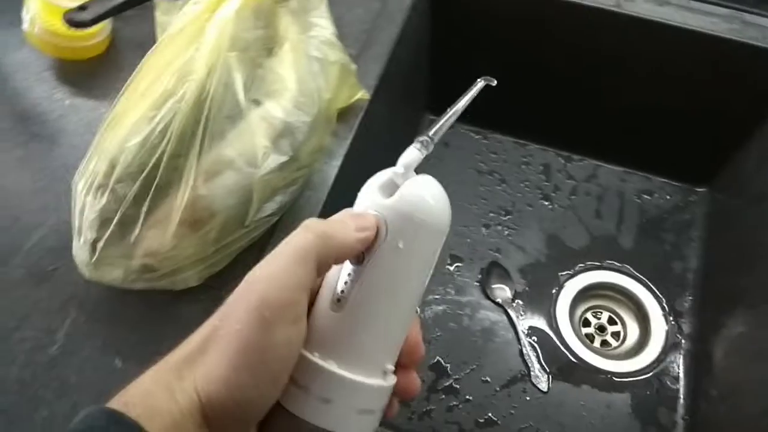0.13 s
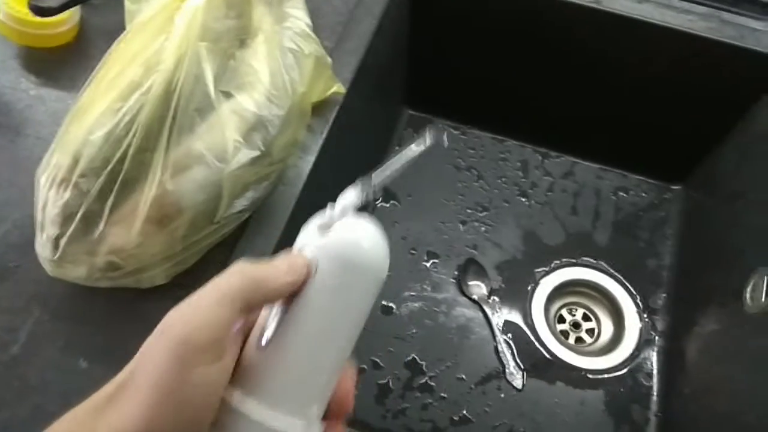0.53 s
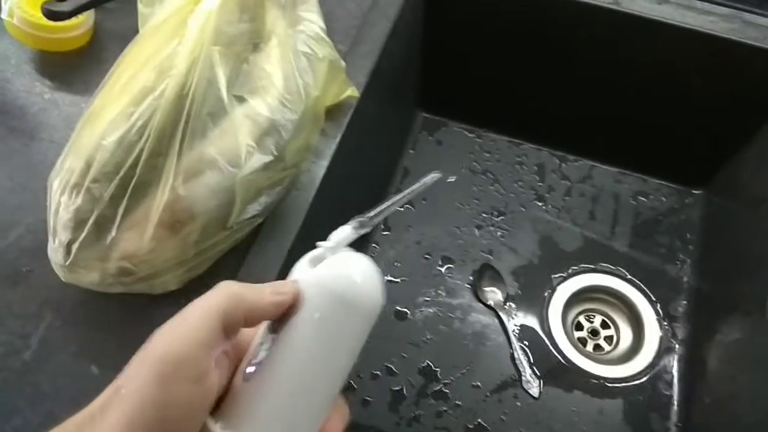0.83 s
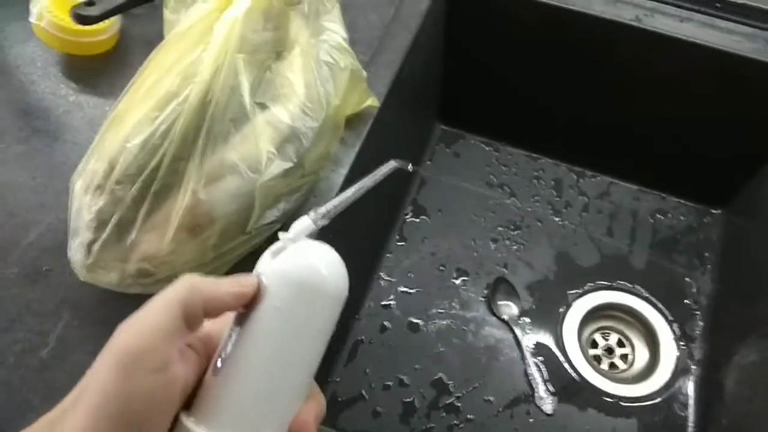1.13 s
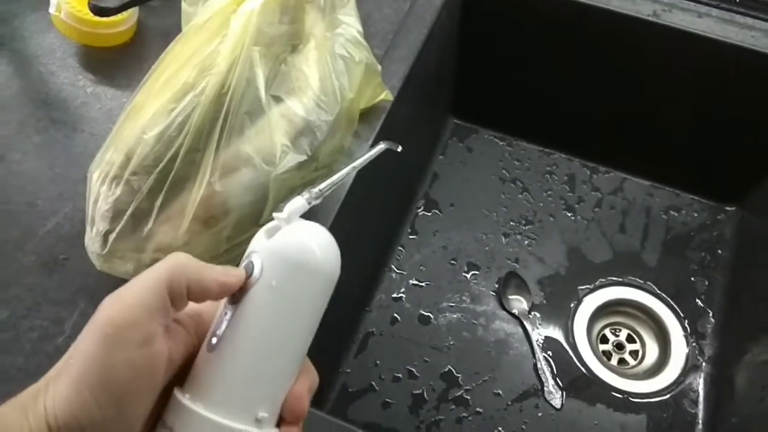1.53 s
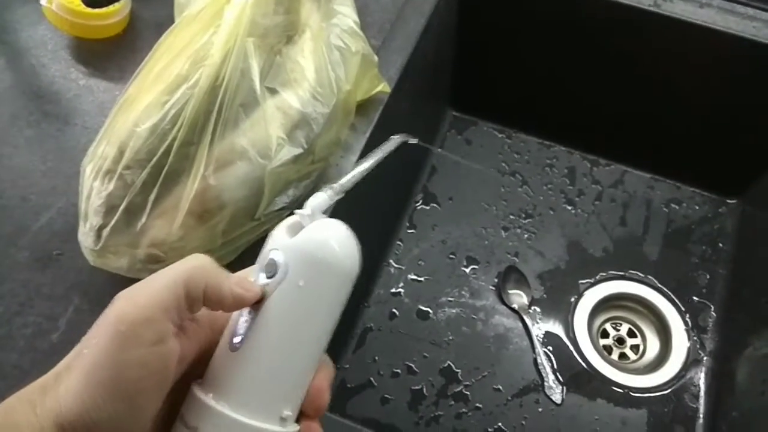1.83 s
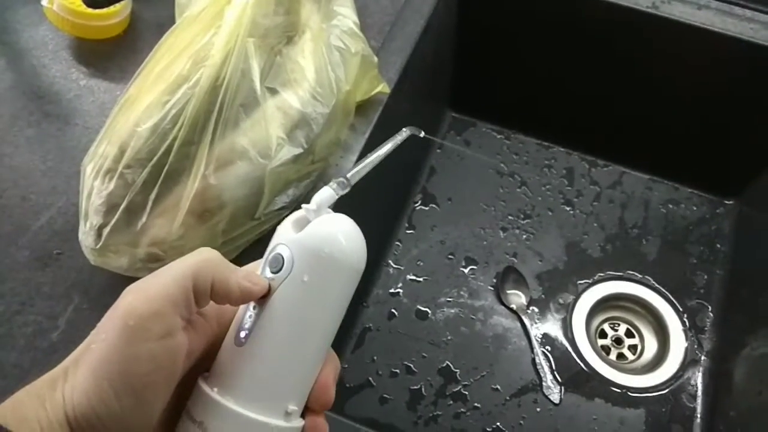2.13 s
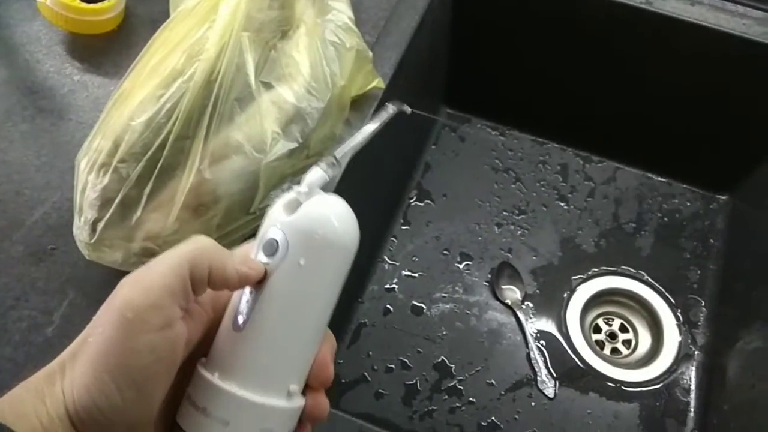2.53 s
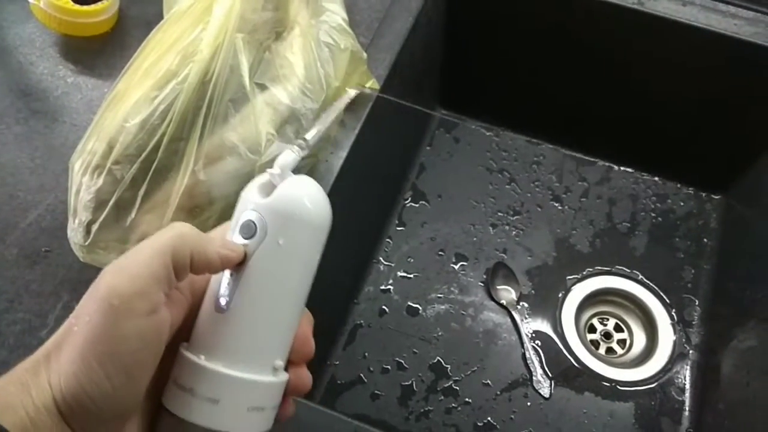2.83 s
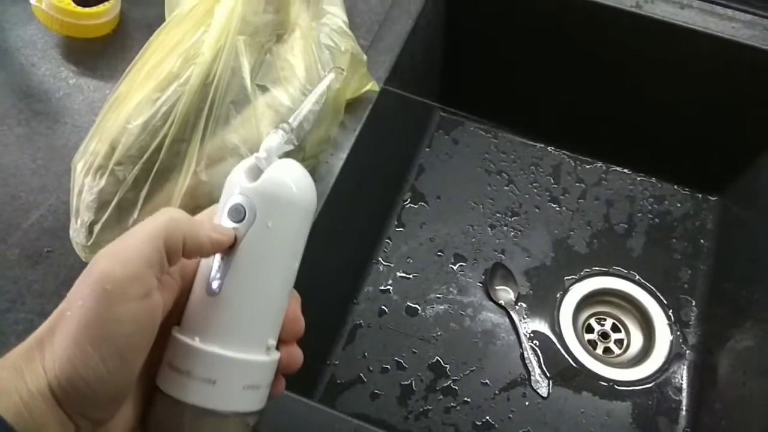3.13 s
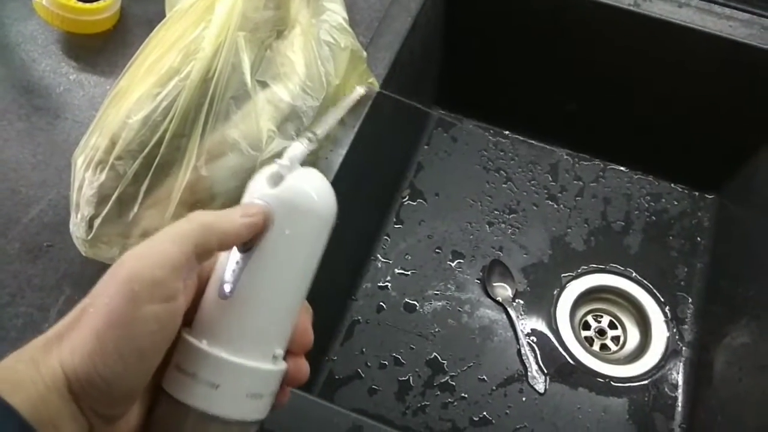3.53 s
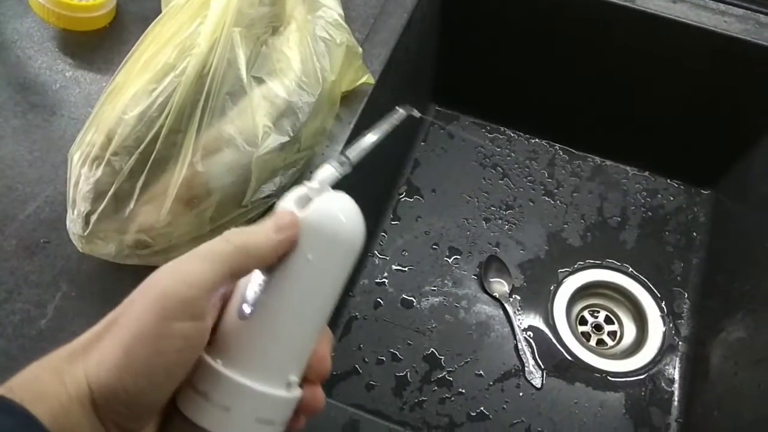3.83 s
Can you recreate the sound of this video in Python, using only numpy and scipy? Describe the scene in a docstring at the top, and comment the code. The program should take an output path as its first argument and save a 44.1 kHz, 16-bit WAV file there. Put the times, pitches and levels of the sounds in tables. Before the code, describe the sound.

A small water flosser clicks on after a brief quiet, its plastic housing rattling and gears whining; the motor then slows to a throbbing buzz with quick regular water spurts, close to a phone in a kitchen.

```python
"""Water flosser over a kitchen sink

A handheld flosser runs over the sink, to the left of a phone with two microphone ports. The button clicks,
the motor starts and its gears rattle the plastic housing. As the pump fills, the motor slows and throbs once
a stroke; the nozzle spits ever more regular spurts, shaped noise over a fine spray. A fridge hums faintly
in summed sine lines behind it, and the phone ducks the quiet room."""
import sys
import numpy as np
from scipy import signal
from scipy.fft import rfft, irfft
from scipy.io import wavfile
from scipy.ndimage import uniform_filter1d

SR = 44100
rng = np.random.default_rng(int(sys.argv[2]) if len(sys.argv) > 2 else 0)


def store_pcm(level_fs):
    """Save levels as 16-bit WAV."""
    pcm = np.round(np.clip(level_fs, -1, 1) * 32767).astype(np.int16)
    wavfile.write(sys.argv[1], SR, np.atleast_2d(pcm).T)


N = 176400  # samples, 4 s

START_S, SPINUP_S = 0.445, 0.005
FREE_HZ, LOADED_HZ = 26, 20.25  # stroke rates of the dry and of the filled pump
STROKE_S = 3.165  # the middle of one pressure stroke
TEETH_PER_STROKE, SAG, WHINE_JITTER = 94, .02, .012  # sag and jitter: fractions of the whine pitch
WHINE_THROB_DB, RATTLE_THROB_DB = 7, 1.38  # swing added by full load
UPPER_RATIO, UPPER_DB = 1.55, -9  # a second gear pair whines higher
BROAD_DB, GRIT_DB = -2.5, 2
# Course of the pump and its gears: time_s, stroke_rate_hz, rattle_db, whine_db (relative levels)
PUMP_COURSE = [(.45, 21.5, -44.5, -45), (.52, 22, -34, -48), (.62, 25, -35.5, -40), (1.1, 25.5, -35.5, -42),
               (1.3, 27.2, -36, -39), (1.55, 27, -35, -39), (1.7, 24, -34, -37), (1.95, 23.2, -33.5, -38.5),
               (2.1, 21.8, -31, -46), (2.3, 20.8, -34, -44.5), (4.0, 20.8, -33.5, -43)]
# Resonances of the plastic housing, plus a steady narrow line near 988 Hz: pitch_hz, width_hz, dry_pump_db,
# filled_pump_db (relative levels)
HOUSING_MODES = [(777.3, 16.3, -24, -16.5), (987.5, 11, -4.5, -2), (1148.5, 25, -16.5, -12.5),
                 (1309, 25, -12, -14), (1503, 15, -24, -13.5), (1942, 29, -8, -3.5), (2047, 36, -4.5, -1),
                 (2194, 39, -1.5, -7.5), (2368, 79, 0.5, -5.5), (2602, 54, -3, -7), (3088, 187, 2.5, 1),
                 (3308, 88, 1.5, -9.5), (3820, 86, -9, -16.5), (5715, 590, 2.5, -5)]
# Colour of the rattle between the resonances: pitch_hz, density_db (relative, per Hz)
RATTLE_COLOUR = [(25, -40), (100, -28), (290, -16), (690, -17.5), (1000, -3), (1600, -6.5), (2400, 1.5),
                 (2760, -4), (3500, -11.5), (4400, -7), (6000, -15.5), (8500, -6.5), (11000, -17.5)]
# Colour of the gear knocks that drive the housing: pitch_hz, density_db (relative, per Hz)
KNOCK_COLOUR = [(100, -35), (600, -20.5), (950, -4), (20000, 3.5)]


def motor(t):
    """Gear rattle rings the housing; the tooth whine follows the speed and swells on each pressure stroke."""
    time_s, *courses = np.array(PUMP_COURSE).T
    rate, rattle_db, whine_db = (np.interp(t, time_s, course) for course in courses)
    load = np.clip((FREE_HZ - rate) / (FREE_HZ - LOADED_HZ), 0, 1)
    strokes = np.cumsum(rate) / SR
    push = np.cos(2 * np.pi * (strokes - np.interp(STROKE_S, t, strokes)))

    grit = grains(900, GRIT_DB) * undb(RATTLE_THROB_DB * load * push)
    body = undb(BROAD_DB) * grit * hiss(RATTLE_COLOUR)
    knocks = grit * hiss(KNOCK_COLOUR)
    for pitch_hz, width_hz, dry_db, full_db in HOUSING_MODES:
        mode = level(ring(knocks, pitch_hz, width_hz), dry_db)
        body = body + mode * undb(load * (full_db - dry_db) - 7.5)

    # The speed sags 300 samples after each push
    speed = 1 - SAG * load * np.roll(push, 300) + WHINE_JITTER * walk(150)
    phase = 2 * np.pi * np.cumsum(TEETH_PER_STROKE * rate * speed) / SR
    upper_gain = undb(UPPER_DB + 4.7 * walk(90))
    whine = stereo_tone(phase) + upper_gain * stereo_tone(UPPER_RATIO * phase)
    throb_db = (3.0 + WHINE_THROB_DB * load) * push
    whine = whine * undb(whine_db + throb_db + 2.36 * walk(60))

    spinup = np.clip((t - START_S) / SPINUP_S, 0, 1)
    return (body * undb(rattle_db) + whine) * spinup


def stereo_tone(phase):
    """A sine stronger at the left port, with the right port shifted in phase."""
    return np.array([undb(5.0) * np.sin(phase), undb(-3.0) * np.sin(phase + 1.6)])


SPURT_DB, LINGER_DB, DROPS_DB = -9.5, -10, 1  # all spurts, their tails, droplet unevenness
RISE_S, HOLD_S, FALL_S, LINGER_S = 0.0017, 0.0034, 0.0058, 0.036
# Spurts from the nozzle: start_s, level_db (relative, before SPURT_DB)
SPURT_TIMES = [(0.4853, -41), (0.519, -12.5), (0.5682, -17), (0.63, -31), (1.1678, -27), (1.1992, -17.5),
               (1.2721, -32), (1.3155, -36), (1.3519, -27), (1.4222, -23), (1.527, -38), (1.5579, -33),
               (1.599, -23.5), (1.6792, -27), (1.719, -20.5), (1.757, -24), (1.8338, -21), (1.915, -15),
               (1.9675, -16), (2.0003, -15), (2.043, -19), (2.113, -18.5), (2.1543, -13.5), (2.203, -20.5),
               (2.25, -12), (2.2938, -18.5), (2.34, -16.5), (2.389, -16.5), (2.437, -18), (2.4863, -20.5),
               (2.5342, -25), (2.5816, -17), (2.6325, -20), (2.6779, -21), (2.7268, -17.5), (2.774, -14.5),
               (2.8235, -18), (2.869, -17), (2.9173, -17.5), (2.9652, -14), (3.0145, -14), (3.0625, -12),
               (3.1104, -11.5), (3.156, -8.5), (3.206, -13.5), (3.2546, -9.5), (3.303, -12.5),
               (3.351, -12.5), (3.399, -10), (3.4461, -14), (3.495, -13), (3.5426, -14), (3.5908, -16.5),
               (3.6402, -16.5), (3.689, -17), (3.737, -17.5), (3.7846, -15), (3.8343, -20), (3.8811, -18),
               (3.929, -18), (3.9759, -20.5)]
# Colour of the spurts: pitch_hz, density_db (relative, per Hz)
SPURT_COLOUR = [(30, -29), (300, -21), (2000, -26), (5000, -13.5), (8000, -4), (11000, 2), (14000, 2.5),
                (16000, -7.5)]
# Fine spray between the spurts: time_s, level_db (before its random wavering)
SPRAY_COURSE = [(.46, -68), (.52, -47), (.62, -40), (.7, -66), (1.15, -55.5), (1.5, -52), (1.85, -48),
                (2.0, -32), (2.15, -28), (2.3, -42), (2.55, -38), (2.9, -50), (3.2, -47), (3.5, -52.5),
                (3.8, -53), (4.0, -41)]
# Colour of the spray: pitch_hz, density_db (relative, per Hz)
SPRAY_COLOUR = [(2500, -28), (4000, -29), (7750, -10), (13500, 1.5), (16000, -15.5)]


def water(t):
    """Each spurt tears out of the nozzle fast and trails off in droplets; a fine spray fills the gaps."""
    kicks = np.zeros(N)
    for start_s, level_db in SPURT_TIMES:
        kicks[int((start_s + HOLD_S) * SR)] = undb(level_db + SPURT_DB)
    # Each kick ends a short plateau and begins the fall
    held = sum(np.roll(kicks, -j) for j in range(int(HOLD_S * SR)))
    tails = fade(kicks, FALL_S) + undb(LINGER_DB) * fade(kicks, LINGER_S)
    shape = uniform_filter1d(held + tails, int(RISE_S * SR) + 1)
    spurts = shape * grains(1500, DROPS_DB) * hiss(SPURT_COLOUR)

    spray_db = np.interp(t, *np.array(SPRAY_COURSE).T) + 1.7 * walk(40)
    spray = undb(spray_db) * grains(1200, 2.2) * hiss(SPRAY_COLOUR)
    return spurts + spray * (t > START_S)


CLICK_S, CLICK_DB, CLICK_TAIL_DB = .3405, -27.5, -12  # the tail is relative to the snap
CLICK_T60_S, TAIL_T60_S = .015, 0.34  # time to fall by 60 dB
PRESS_LEAD_S, PRESS_DB = .005, -8.5  # the thumb lands just before the snap
# Colour of the button click: pitch_hz, density_db (relative, per Hz)
CLICK_COLOUR = [(300, -12), (700, -14), (1500, -8.5), (3600, 3.5), (8000, 8), (13000, 9.5), (16000, 6.5)]


def button():
    """A dry plastic snap and its short ring in the basin, as two exponential fades of noise."""
    kicks = np.zeros(N)
    kicks[int(CLICK_S * SR)] = undb(CLICK_DB)
    kicks[int((CLICK_S - PRESS_LEAD_S) * SR)] = undb(CLICK_DB + PRESS_DB)
    t60_ratio = np.log(1000)  # 60 dB in time constants
    snap = fade(kicks, CLICK_T60_S / t60_ratio)
    basin = undb(CLICK_TAIL_DB) * fade(kicks, TAIL_T60_S / t60_ratio)
    return (snap + basin) * hiss(CLICK_COLOUR)


ROOM_DB = -71  # rms, before ducking
# Lines of the fridge compressor: pitch_hz, level_db (relative)
FRIDGE_LINES = [(240, -80.5), (296, -72), (540, -79), (588, -73), (637, -80)]
# Colour of the room noise: pitch_hz, density_db (relative, per Hz)
ROOM_COLOUR = [(40, -33), (101, -24), (290, -4), (467, -20), (585, -11), (733, -25), (16000, -41)]


def kitchen(t):
    """Fridge compressor lines, wavering in level and phase, over faint room noise."""
    hum = 0
    for pitch_hz, level_db in FRIDGE_LINES:
        gain = undb(level_db + 1 + 3.0 * walk(24.5))
        hum = hum + gain * np.sin(2 * np.pi * pitch_hz * t + 0.46 * walk(12))
    return hum + undb(ROOM_DB) * hiss(ROOM_COLOUR)


# Likeness of the two microphone ports: pitch_hz, correlation (-1 to 1)
PORT_LIKENESS = [(60, 0.62), (130, 0.55), (290, 0.89), (640, 0.56), (1410, 0.29), (3100, -0.041),
                 (6820, -0.045), (15000, 0.073)]
# Lean toward the left port: pitch_hz, left_minus_right_db
LEFT_LEAN = [(60, 0.0), (110, -0.5), (200, -0.5), (380, -1.5), (700, -1.5), (1290, 1.5), (2380, 3.5),
             (4400, -3), (8120, 3), (15000, 12.5)]


def hiss(colour):
    """Coloured stereo noise, alike and leaning left as the microphone ports hear it; rms 1."""
    log_hz = np.log(np.arange(N // 2 + 1) * SR / N + 1)

    def curve(table):
        pitch_hz, value = np.array(table).T
        return np.interp(log_hz, np.log(pitch_hz), value)

    likeness = np.clip(curve(PORT_LIKENESS), -.95, .95)
    mid, side = rfft(rng.standard_normal((2, N)))
    mid = np.sqrt(1 + likeness) * mid
    side = np.sqrt(1 - likeness) * side
    pair = np.array([mid + side, mid - side])
    port_db = curve(colour) + np.array([[.5], [-.5]]) * curve(LEFT_LEAN)
    return level(irfft(pair * undb(port_db), N), 0)


def ring(x, hz, width):
    """Two-pole resonance; a wider one dies sooner."""
    r = np.exp(-np.pi * width / SR)
    return signal.lfilter([1], [1, -2 * r * np.cos(2 * np.pi * hz / SR), r * r], x)


def walk(rate):
    """Random levels, one every 1 / rate s, slewed from one to the next; spread near 1."""
    k = int(SR / rate)
    steps = np.repeat(rng.standard_normal(N // k + 1), k)
    return 1.209 * uniform_filter1d(steps, k)[:N]


def grains(rate, spread_db):
    """Flutter of uneven grains, mostly small, a few large; rms 1."""
    k = int(SR / rate)
    size = np.minimum(rng.exponential(size=N // k + 1), 5)
    steps = np.repeat(undb(spread_db * size), k)
    return level(uniform_filter1d(steps, k)[:N], 0)


def fade(x, seconds):
    """Exponential tail after each impulse, starting at the impulse's height."""
    return signal.lfilter([1], [1, -np.exp(-1 / (seconds * SR))], x)


def undb(db):
    """Decibels to amplitude ratio."""
    return 10 ** (np.asarray(db) / 20)


def level(x, db):
    """Set the rms level in dB."""
    return x * undb(db) / np.sqrt(np.mean(x ** 2))


def scene():
    """The flosser at the sink, its button, and the kitchen behind."""
    t = np.arange(N) / SR
    return motor(t) + water(t) + button() + kitchen(t)


DUCK_DB, DUCK_BELOW_DB, DUCK_HOLD_S = -14, -75, .2
TOP_HZ = 15900


def record(dry):
    """The phone ducks both ports while the left port's treble stays low, and cuts the top."""
    highpass = signal.butter(4, 2000, "high", fs=SR, output="sos")
    treble = np.abs(signal.sosfilt(highpass, dry[0]))
    treble_level = fade(treble, DUCK_HOLD_S) / (DUCK_HOLD_S * SR)
    busy = treble_level > undb(DUCK_BELOW_DB)
    gain = undb(DUCK_DB * (1 - uniform_filter1d(1. * busy, size=200)))
    lowpass = signal.ellip(10, .2, 80, TOP_HZ, fs=SR, output="sos")
    return signal.sosfilt(lowpass, dry * gain)


dry = scene()
out = record(dry)
store_pcm(out)
```